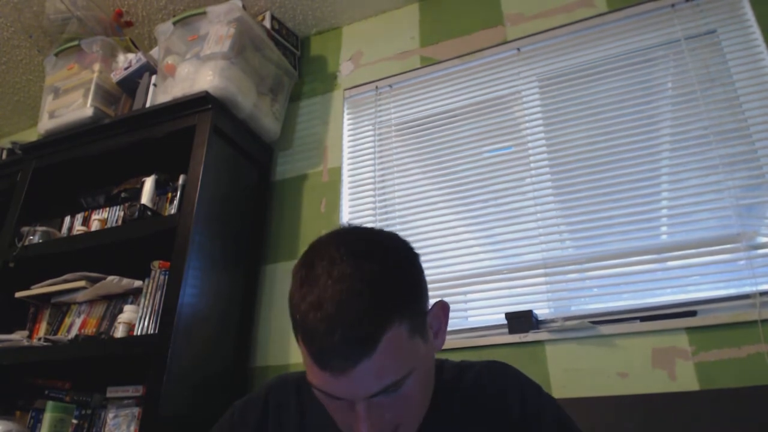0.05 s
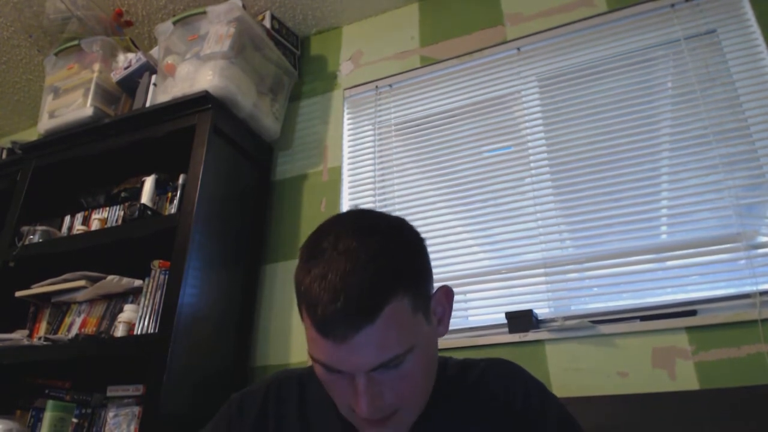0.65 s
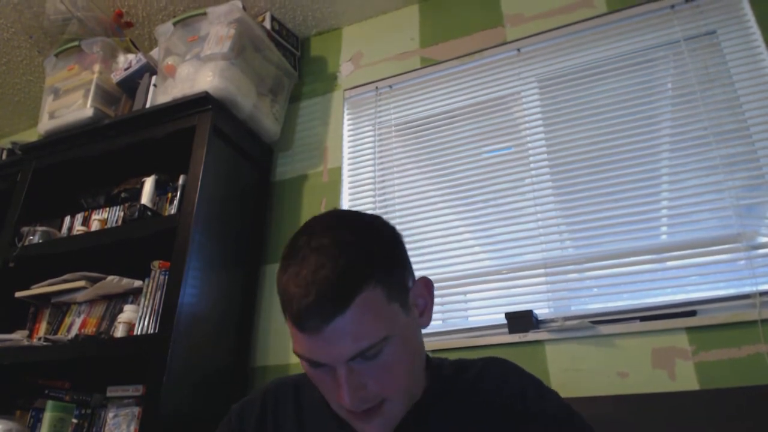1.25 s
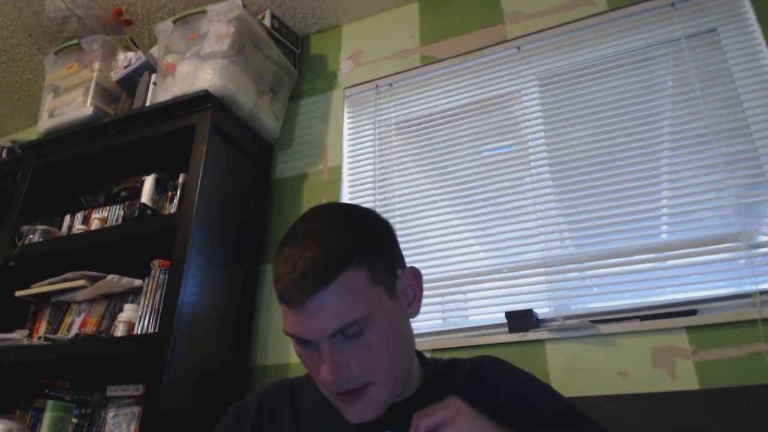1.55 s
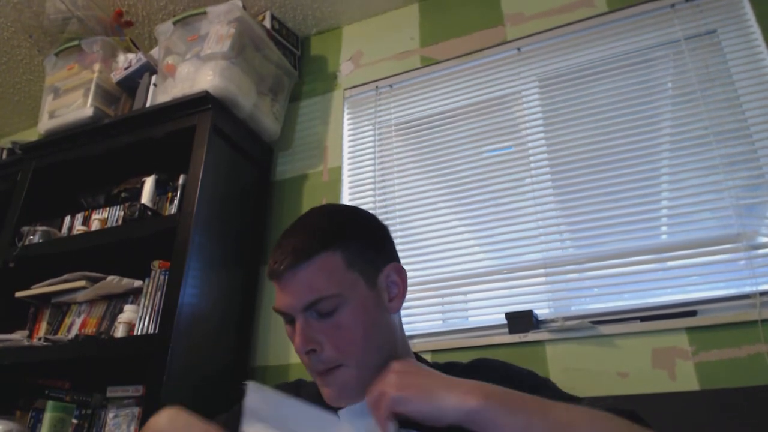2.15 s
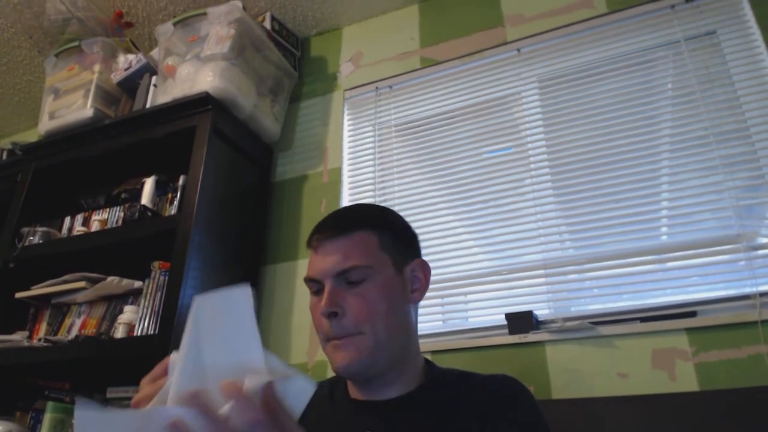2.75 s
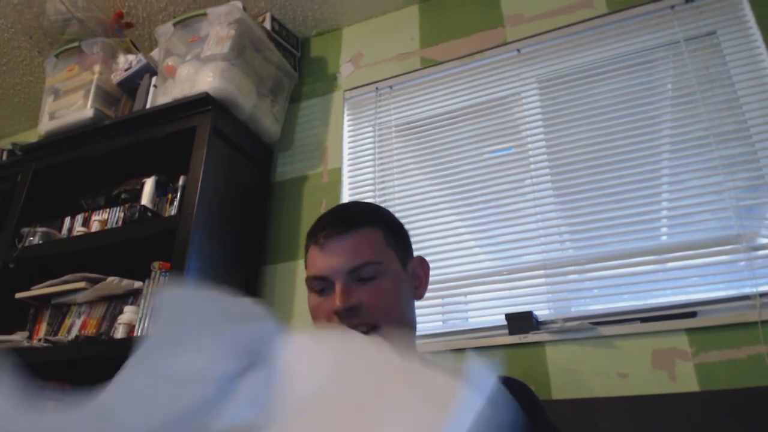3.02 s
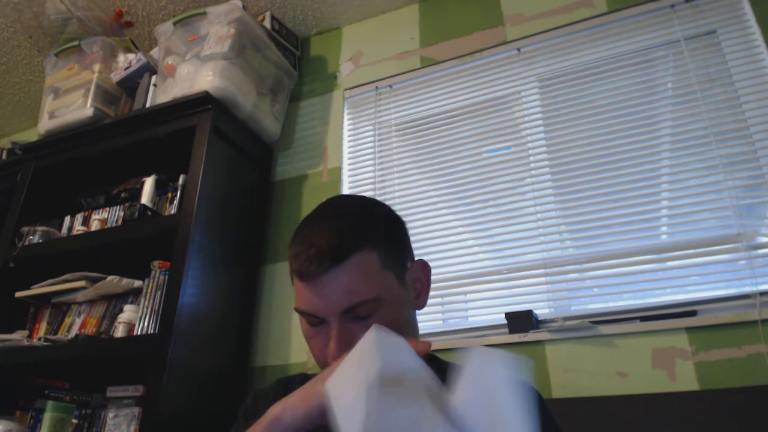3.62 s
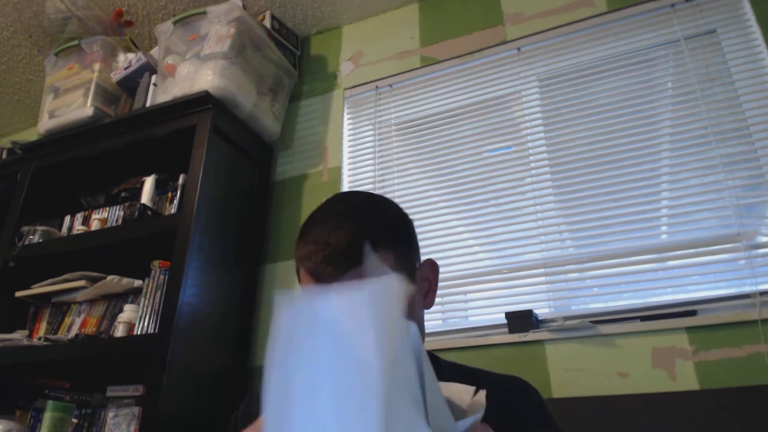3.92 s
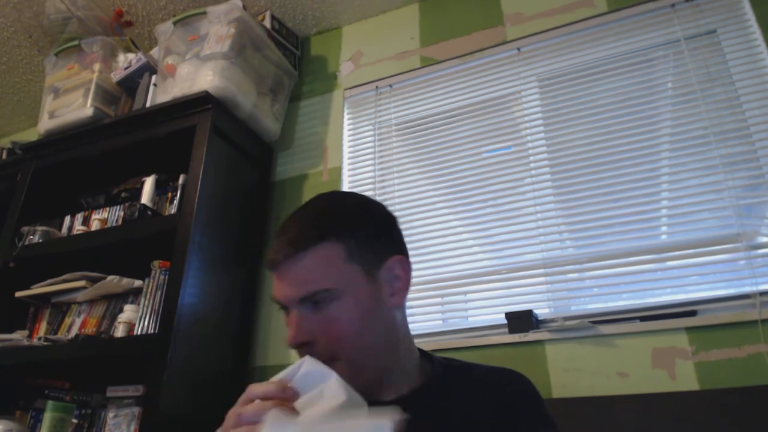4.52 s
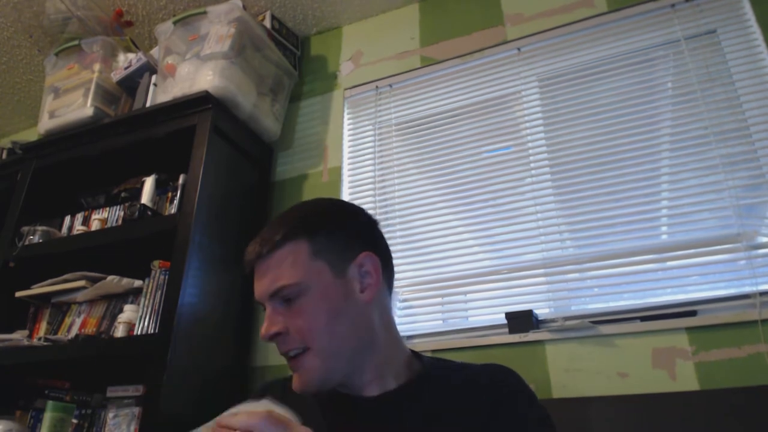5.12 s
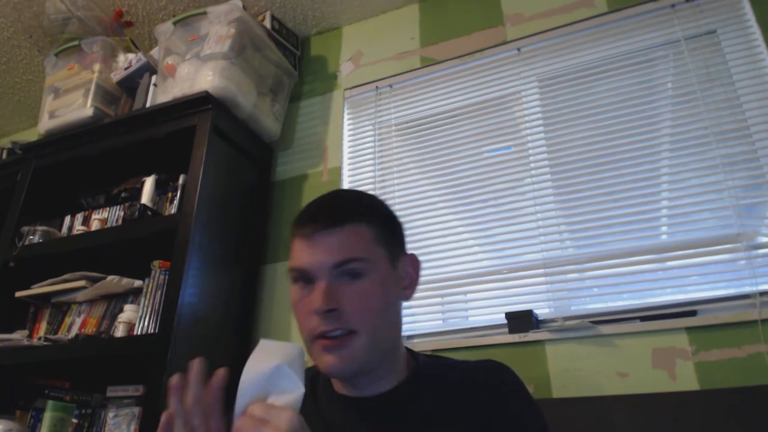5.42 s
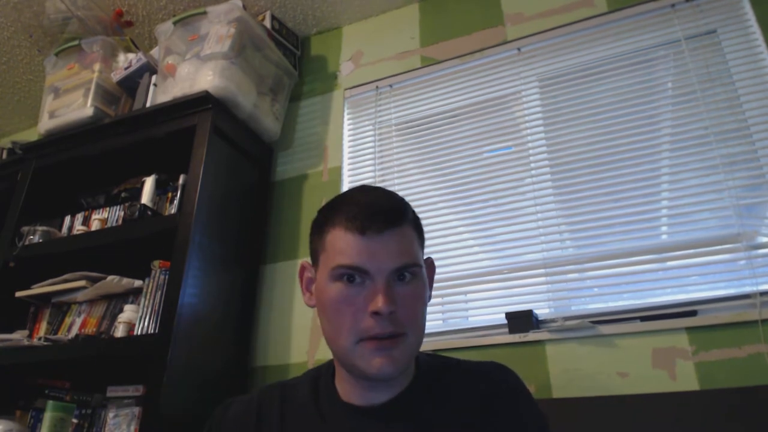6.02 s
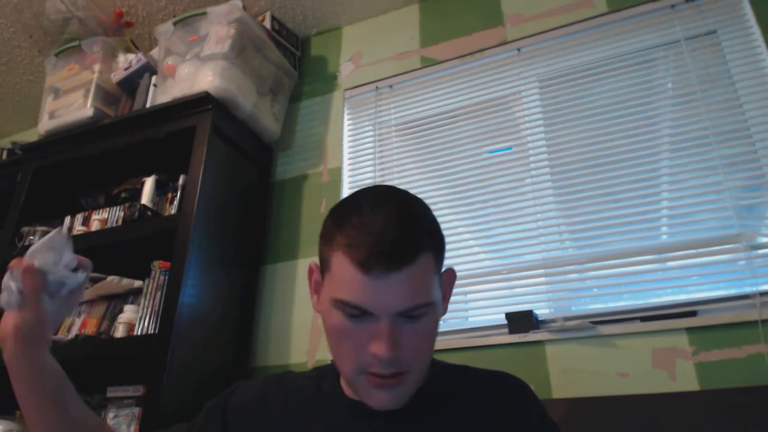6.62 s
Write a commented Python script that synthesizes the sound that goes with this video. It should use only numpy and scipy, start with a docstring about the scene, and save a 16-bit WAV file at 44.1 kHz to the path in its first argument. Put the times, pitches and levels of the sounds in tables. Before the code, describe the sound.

Stiff paper is pulled off a parcel, shaken open and crumpled close by, in loud, irregular crinkling bursts in a small, quiet room.

```python
"""Stiff wrapping paper, pulled off a parcel, shaken open and crumpled in a small, dry room,
close to a two-port desk microphone. The sheet buckles in avalanches of tiny clicks: each rings a
crease, flexes a panel and flaps the air; big folds snap singly. Paper sliding on paper hisses
underneath. Fingers tap its hollows, edges scrape, and now and then the sheet jerks taut with a
dry crack or thumps as a whole."""
import sys
import numpy as np
from scipy import signal
from scipy.fft import rfft, irfft, next_fast_len
from scipy.io import wavfile
from scipy.ndimage import uniform_filter1d, map_coordinates

SR = 44100
rng = np.random.default_rng(int(sys.argv[2]) if len(sys.argv) > 2 else 0)


def int16_out(signal):
    """Quantize to a 16-bit WAV file."""
    q = np.round(np.clip(np.atleast_2d(signal).T, -1, 1) * 32767)
    wavfile.write(sys.argv[1], SR, q.astype(np.int16))


N = 298326

# the first long pull is mostly sheet sliding on sheet, later it mostly buckles: t/s, extra sliding/dB
EXTRA_SLIDING = [(.3, 3.5), (1.05, 7), (1.4, 1.5), (5.2, 0), (5.4, 1)]


def amp(db):
    """Decibels to gain."""
    return 10 ** (np.asarray(db) / 20)


def unit(x):
    """Scale to rms 1."""
    return x / np.sqrt(np.mean(x ** 2) + 1e-20)


def along(points, hz):
    """Read (f/Hz, value) points on a log frequency axis."""
    f, values = np.transpose(points)
    return np.interp(np.log(hz + 1), np.log(f + 1), values)


def curves(rows):
    """One value per sample for each column after the time."""
    times, *columns = np.transpose(rows)
    return [np.interp(np.arange(N) / SR, times, column) for column in columns]


def wobble(rate):
    """A smooth random curve, rate knots a second."""
    return map_coordinates(rng.standard_normal(N // 10), [np.arange(N) * rate / SR], mode="mirror")


def coloured(x, db_of_hz):
    """x through the causal (minimum-phase) filter with this gain curve."""
    n = x.shape[-1]
    m = 2 * next_fast_len(n * 5 // 8)
    cepstrum = irfft(np.log(amp(db_of_hz(np.fft.rfftfreq(m, 1 / SR))) + 1e-6))
    cepstrum[1:m // 2] *= 2
    cepstrum[m // 2 + 1:] = 0
    return irfft(rfft(x, m) * np.exp(rfft(cepstrum)), m)[..., :n]


def bump(hz, centre, width):
    """A resonance peak of height 1."""
    return 1 / (1 + (2 * (hz - centre) / width) ** 2)


def levelled(x, size=1300):
    """Rms 1 over every few hundredths of a second; single clicks keep their shape."""
    power = uniform_filter1d(uniform_filter1d(x ** 2, size), size)
    return x / np.sqrt(np.abs(power) + 1e-12)


def patchy(x, gain_of_chance):
    """x under a random gain that changes smoothly from pitch to pitch and from moment to moment."""
    spectra = signal.stft(x, nperseg=256)[2]
    field = uniform_filter1d(rng.standard_normal(spectra.shape), size=3, axis=0)
    field = uniform_filter1d(field, size=12, axis=1)
    return signal.istft(spectra * unit(gain_of_chance(unit(field))), nperseg=256)[1][:N]


def handling(lead_s=0.011, attack_s=0.0083, sag_db_per_s=12.5):
    """Gains of flap, flex, crackle and fizz: each stroke takes hold, sags as the paper gives, and dies."""
    # pulls, shakes and squeezes: worked loose, pulled off from 2 s, crushed from 4.4 s, put by from 5.3 s
    # start/s, hold/s, release t60/s, crackle/dB, flex re crackle/dB, fizz re crackle/dB
    strokes = [ (0.004, 0.22, 0.24, -43.5, 3, -3), (0.224, 0.19, 0.3, -31, 6, 6.5),
               (0.443, 0.049, 0.15, -27.5, 0, 1), (0.513, 0.18, 0.14, -26.5, 1, 4.5),
               (0.696, 0.099, 0.7, -23.5, 0, -2), (0.97, 0.047, 0.46, -36.5, -4, 4),
               (1.145, 0.062, 0.075, -38.5, 4.5, -11), (1.258, 0.025, 0.025, -33.5, -5.5, -36),
               (1.361, 0.092, 0.074, -34.5, 4, 3), (1.396, 0.019, 0.27, -22.5, -6, 6),
               (1.64, 0.018, 0.057, -31, -1.5, 0.5), (1.651, 0.057, 0.65, -51, -17, 21.5),
               (1.77, 0.023, 0.29, -39.5, 4, 9.5), (1.999, 0.008, 0.042, -18.5, -7.5, -7.5),
               (2.021, 0.063, 0.081, -23, -4, -2.5), (2.133, 0.031, 0.38, -26, 0, -6),
               (2.219, 0.036, 0.2, -19, -1.5, -1.5), (2.279, 0.065, 0.069, -27, -3.5, -2.5),
               (2.369, 0.046, 0.29, -33.5, 3.5, -6), (2.417, 0.16, 0.1, -24, -2.5, -6),
               (2.633, 0.025, 0.35, -35.5, 7.5, -40), (2.985, 0.007, 0.065, -30, -4, -14),
               (3.07, 0.059, 0.15, -26.5, -6, -16), (3.139, 0.057, 0.065, -21, -6.5, 2),
               (3.268, 0.23, 0.46, -20.5, -5, -4.5), (3.509, 0.014, 0.062, -19.5, -19.5, 1.5),
               (3.592, 0.1, 0.39, -27, -12, -4), (3.685, 0.047, 0.71, -30, 0, -0.5),
               (3.815, 0.041, 0.13, -27.5, -2.5, 3), (3.902, 0.035, 0.17, -28.5, -5, 0.5),
               (4.036, 0.016, 0.032, -23, -13, -17.5), (4.144, 0.045, 0.081, -35, -11.5, 4),
               (4.419, 0.046, 0.26, -16.5, -6, -1), (4.497, 0.13, 0.97, -16.5, -6.5, -2),
               (4.803, 0.099, 0.56, -20, -6, -3), (4.97, 0.1, 0.27, -20.5, -4, -11.5),
               (5, 0.041, 0.43, -15, -5.5, -1.5), (5.125, 0.046, 0.24, -21.5, -3.5, -1.5),
               (5.207, 0.054, 0.096, -33.5, -4, 7), (5.333, 0.009, 0.098, -30.5, -21, -0.5),
               (5.394, 0.013, 0.33, -42.5, 2, 2.5), (5.539, 0.078, 0.108, -43.5, 8, -11),
               (5.658, 0.055, 0.24, -36.5, -10.5, -11.5), (6.058, 0.11, 0.051, -47, -22, 12.5),
               (6.215, 0.0063, 0.17, -36, -2, 12), (6.241, 0.0066, 0.057, -28.5, 6, 9.5),
               (6.298, 0.2, 0.36, -42.5, -15, -12)]
    # the paper stirs faintly as long as it is held: t/s, crackle/dB, fizz re crackle/dB
    holding = [(0, -54.5, 1), (1.1, -69, -3.5), (1.3, -51.5, -2), (1.6, -53.5, 3), (2.0, -51.5, 4.5),
               (2.72, -47, -5.5), (2.9, -55, -6), (4.12, -46, -9.5), (4.25, -62.5, -17), (4.4, -53, 3.5),
               (5.3, -55.5, 0), (5.95, -53.5, 1), (6.52, -55.5, 11), (6.76, -58.5, -6)]
    # an open sheet flaps the air, a tight ball hardly does: t/s, flap gain/dB
    openness = [(0, -20.5), (.33, -3.5), (.95, -15), (1.3, -5), (2.2, -4), (3.4, -4.5), (3.9, -3.5),
                (5.1, -10.5), (5.24, -47), (6.22, -40), (6.36, 7), (6.6, -28.5)]

    def shares(flex_db, fizz_db):
        """Power of the four layers relative to the crackle; the flap partly follows the flex."""
        return amp([[0.54 * flex_db], [flex_db], [0], [fizz_db]]) ** 2

    t = np.arange(N) / SR
    stir_db, stir_fizz_db = curves(holding)
    power = shares(flex_db=-6, fizz_db=0) * amp(stir_db) ** 2
    power[3] *= amp(stir_fizz_db) ** 2
    for start, hold, t60, db, flex_db, fizz_db in strokes:
        part = slice(*np.searchsorted(t, [start - 2 * lead_s, start + hold + t60]))
        age = t[part] - start
        fall_db = sag_db_per_s * (age - hold / 2) + 60 * np.maximum(age - hold, 0) / t60
        envelope = np.clip(age / attack_s, 0, 1) * amp(db - fall_db)
        power[:, part] += shares(flex_db, fizz_db) * envelope ** 2
        # as the hand first grips, the panels flex softly, with few creases
        grip = amp(db + flex_db - 9.5 - 20 * np.abs(age) / lead_s)
        power[1:3, part] += (amp([[0], [-25.5]]) * grip) ** 2
    flap, flex, crackle, fizz = np.sqrt(power)
    return flap * amp(curves(openness)[0]), flex, crackle, fizz


def buckles(per_second, spread_db, clump_db, clump_rate, count=14000):
    """Times (samples) and sizes (dB) of tiny buckles: many faint, few strong, bunched in avalanches."""
    at = (np.cumsum(rng.exponential(1, count)) * SR / per_second).astype(int)
    now = np.minimum(at, N - 1)
    uneven_db = spread_db - 0.45 * curves(EXTRA_SLIDING)[0][now]  # sliding evens out the sizes
    size_db = uneven_db * np.minimum(rng.standard_normal(count), 2.5)
    return at, size_db + clump_db * wobble(clump_rate)[now]


def facets(clicks, spectrum, ring_hz, octaves, cycles, scatter_db, slide_db, size):
    """Each buckle rings a facet of its own pitch for a few cycles, over the hiss of sliding paper."""
    at, size_db = clicks
    t = np.arange(size) / SR
    pitch_chance, level_chance = rng.standard_normal((len(at), 2)).T
    # neighbouring buckles share a fold, so their pitch drifts together
    drift_octaves = 0.33 * wobble(30)[np.minimum(at, N - 1)]
    hz = ring_hz * 2 ** (octaves * pitch_chance + drift_octaves)
    heard = at < N
    phase = hz[heard, None] * t
    strength = amp(size_db + scatter_db * level_chance)[heard, None]
    rings = strength * np.exp(-phase / cycles) * np.cos(2 * np.pi * phase)
    cloud = np.bincount((at[heard, None] + np.arange(size)).ravel(), rings.ravel(), N)[:N]
    cloud, hiss = coloured(np.array([cloud, rng.standard_normal(N)]), lambda f: along(spectrum, f))
    rubbing = amp(slide_db + curves(EXTRA_SLIDING)[0])
    return (unit(levelled(cloud)) + rubbing * unit(hiss)) / np.hypot(1, rubbing)


def folding(x, depth_db):
    """The changing shape of the sheet favours some pitches and hides others."""
    return patchy(x, lambda chance: amp(depth_db * chance))


def rustle():
    """The same buckles drive the whole sheet, its panels, its creases and its fibres."""
    # what each size of paper radiates: f/Hz, relative level/dB
    sheet_spectrum = [(20, -54), (50, -45), (110, 1), (170, 0.5), (330, 7.5), (450, 13), (800, -39.5)]
    panel_spectrum = [(150, -52.5), (330, -9), (450, -8.5), (950, -5), (1250, -23), (2400, -47.5)]
    crease_spectrum = [(450, -37), (900, -7), (1200, 3.5), (2800, -0.5), (3700, -10), (6500, -22)]
    fibre_spectrum = [(1500, -45.5), (2800, 3.5), (3600, -2), (6300, 2), (9000, 0)]
    flap_gain, flex_gain, crackle_gain, fizz_gain = handling()
    clicks = buckles(per_second=1150, spread_db=6.4, clump_db=3.7, clump_rate=110)
    flap = facets(clicks, sheet_spectrum, ring_hz=187, octaves=0.73, cycles=0.63,
                  scatter_db=1.5, slide_db=-7, size=600)
    flex = facets(clicks, panel_spectrum, ring_hz=683, octaves=0.36, cycles=2.06,
                  scatter_db=-0.5, slide_db=-12.5, size=500)
    crackle = facets(clicks, crease_spectrum, ring_hz=1850, octaves=0.62, cycles=2.3,
                     scatter_db=-1, slide_db=0, size=250)
    fizz = facets(clicks, fibre_spectrum, ring_hz=4950, octaves=0.4, cycles=2.6,
                  scatter_db=2.5, slide_db=1.5, size=120)
    sheet = flap_gain * flap + flex_gain * flex + crackle_gain * crackle
    # wide panels take strong colour from the folds, fine fibres little
    return folding(sheet, depth_db=2.1) + folding(fizz_gain * fizz, depth_db=1.3)


def finger_taps(rise_s=0.0015, cycles=1.8, click_t60=0.02, shiver_db=-19.5, shiver_t60=0.058, size=4096):
    """A soft fingertip rings a hollow for a few cycles, with a small click and a shiver at that pitch."""
    # taps on the paper: t/s, ring level/dB, ring f/Hz, click re ring/dB
    taps = [(0.0561, -10.5, 767, -5), (0.153, -14.5, 557, -8), (0.1822, -20.5, 582, -5),
            (1.156, -19, 890, -6.5), (1.16, -19.5, 945, -7), (1.264, -21.5, 1280, -11),
            (1.333, -15.5, 780, -18), (1.653, -18.5, 880, -7.5), (1.693, -17, 1300, -20),
            (2.655, -15.5, 500, -23.5), (4.1451, -23.5, 2450, -22.5), (5.665, -17.5, 550, -10),
            (5.7091, -23, 570, -3)]
    # the click of a fingertip: f/Hz, relative level/dB
    fingertip = [(60, -33.5), (500, -1.5), (2900, 9), (4000, -7)]
    out, t = np.zeros(N + size), np.arange(size) / SR
    for start, db, hz, click_db in taps:
        swing = (1 - np.exp(-(t / rise_s) ** 2)) * np.exp(-t * hz / cycles)
        ring = swing / swing.max() * np.sin(2 * np.pi * hz * t)
        click, shiver = rng.standard_normal((2, size))
        click = unit(coloured(click, lambda f: along(fingertip, f)))
        click *= amp(click_db - 60 * t / click_t60)
        shiver = unit(coloured(shiver, lambda f: 20 * np.log10(bump(f, hz, hz / 2))))
        shiver *= amp(shiver_db - 60 * t / shiver_t60)
        out[round(start * SR):][:size] += amp(db) * (ring + click + shiver)
    return out[:N]


def fold_snaps(crack_db=7, rise_s=0.0008, crack_t60=0.012, shiver_db=-3, shiver_t60=0.04, size=4096):
    """A fold pops: one sharp push, a crack that runs along it, then the sheet shivers and rings briefly."""
    # single folds snapping through: t/s, level/dB, ring f/Hz
    snaps = [(0.2218, -24.5, 838), (0.3777, -13, 864), (0.408, -21.5, 1078), (0.459, -21, 2880),
             (0.5068, -9.5, 2350), (0.711, -16.5, 1430), (0.749, -18.5, 1500), (0.7572, -28.5, 855),
             (0.7839, -15, 689), (0.989, -30, 3300), (1.192, -28, 3330), (1.3752, -11, 790),
             (1.3885, -13, 3090), (1.409, -10.5, 1310), (1.434, -15, 3060), (1.5115, -25, 3100),
             (1.6935, -17.5, 5100), (1.783, -16.5, 2270), (2.004, -25, 2430), (2.0317, -16, 1850),
             (2.0515, -10, 541), (2.052, -10.5, 1925), (2.135, -28, 1500), (2.159, -16.5, 1220),
             (2.2228, -16, 525), (2.2525, -17.5, 2880), (2.3005, -16, 2300), (2.313, -15.5, 1590),
             (2.4996, -10.5, 1880), (2.5542, -14, 1850), (2.82, -36, 1710), (2.931, -38, 1880),
             (3.0785, -22.5, 1850), (3.1026, -15, 2400), (3.15, -14.5, 2450), (3.1575, -13, 2090),
             (3.274, -13.5, 1177), (3.2935, -10.5, 2680), (3.3235, -22.5, 1236), (3.3667, -13.5, 557),
             (3.399, -7, 674), (3.4185, -10, 2550), (3.4647, -14.5, 1370), (3.4679, -9.5, 2100),
             (3.4785, -13, 1200), (3.5185, -20.5, 2000), (3.6382, -15, 2360), (3.6955, -10.5, 542),
             (3.7316, -17, 2780), (3.7483, -18.5, 518), (3.7865, -15.5, 1444), (3.8285, -14.5, 1530),
             (3.8341, -11.5, 1114), (3.858, -14.5, 1930), (3.9237, -13.5, 2560), (3.9392, -13.5, 1450),
             (4.0415, -22, 1760), (4.164, -24, 2660), (4.439, -13, 1880), (4.464, -11.5, 1646),
             (4.4975, -11, 1450), (4.5208, -8, 1517), (4.563, -17.5, 1183), (4.612, -19.5, 1200),
             (4.6445, -13.5, 2125), (4.658, -9, 1720), (4.72, -16.5, 2480), (4.8205, -15, 1530),
             (4.837, -18, 2580), (4.9582, -15.5, 794), (4.9914, -18, 1333), (5.1456, -17, 2100),
             (5.2504, -23.5, 2220), (5.3341, -31.5, 1610), (5.6771, -22.5, 1540), (5.7165, -29.5, 1450),
             (5.8737, -26.5, 2710), (6.0195, -38, 5060), (6.044, -20.5, 2340), (6.0502, -15, 1750),
             (6.0603, -19.5, 2300), (6.1062, -30.5, 4307), (6.1175, -25.5, 880), (6.14, -23, 2300),
             (6.1596, -31, 6060), (6.2205, -24.5, 4170), (6.2451, -28, 1470), (6.2571, -22, 1630),
             (6.3225, -22.5, 1390), (6.4163, -29, 3130), (6.4352, -34, 3200), (6.469, -25, 1230)]
    firm_db = -15.5  # a gentler pop rings more purely
    out, t = np.zeros(N + size), np.arange(size) / SR
    fades = amp([-60 * t / crack_t60, -60 * t / shiver_t60]) * (1 - np.exp(-t / rise_s))
    for start, db, hz in snaps:
        crack, shiver = rng.standard_normal((2, size)) * fades
        burst = crack / np.linalg.norm(crack) + amp(shiver_db) * shiver / np.linalg.norm(shiver)
        push = (t == 0) + amp(crack_db) * burst
        # a wide, low-ringing fold sounds hollow: its treble falls away sooner
        knee_hz = np.clip(1.6 * hz, 1100, 3200)
        tilt = [(30, -20.5), (130, -15.5), (330, -5.5), (600, -1), (knee_hz, 0), (4500, -5)]  # f/Hz, gain/dB
        # the harder the snap, the broader and less pitched its ring
        width_hz = 0.52 * hz * np.sqrt(amp(db - firm_db))
        ring_db = 11 + 0.45 * max(firm_db - db, 0)
        pop = coloured(push, lambda f: along(tilt, f) + ring_db * bump(f, hz, width_hz))
        pop *= np.sqrt(SR / 200 / np.sum(pop ** 2))  # the energy of 5 ms at rms 1
        out[round(start * SR):][:size] += amp(db + 0.5) * pop
    return out[:N]


def edge_scrapes(relative_width=0.2, roughness_db=4.5):
    """Stick and slip of a paper edge excites one broad resonance, which moves as the hollow changes shape."""
    # an edge drags over a hollow of the sheet: t/s, length/s, start f/Hz, end f/Hz, level/dB
    scrapes = [(0.24, 0.097, 2360, 2553, -22), (0.235, 0.13, 3070, 3160, -30),
               (0.321, 0.067, 451, 570, -25.5), (1.09, 0.13, 639, 823, -35.5),
               (1.148, .06, 1470, 1163, -31.5), (1.698, 0.026, 1250, 1580, -31),
               (1.699, 0.029, 485, 431, -37), (2.09, 0.17, 517, 484, -29), (2.575, 0.21, 1748, 1560, -33),
               (3.013, 0.027, 665, 740, -41.5), (3.218, 0.071, 748, 694, -35),
               (3.877, .08, 1454, 1335, -28), (3.93, .08, 1159, 893, -36), (3.956, .05, 450, 382, -34.5),
               (5.596, 0.036, 554, 1420, -39.5), (6.07, 0.081, 1062, 720, -40),
               (6.071, 0.11, 1550, 2530, -42), (6.287, 0.069, 1286, 1408, -34.5),
               (6.321, 0.087, 4220, 3460, -37.5), (6.436, 0.039, 1436, 1200, -38)]
    out, t = np.zeros(N), np.arange(N) / SR
    slips = amp(roughness_db * wobble(130))
    waver = 1 + 0.022 * wobble(49)
    for start, length, start_hz, end_hz, db in scrapes:
        part = (t >= start) & (t < start + length)
        progress = (t[part] - start) / length
        hz = (start_hz + (end_hz - start_hz) * progress) * waver[part]
        width_hz = relative_width * start_hz
        friction = rng.standard_normal(SR // 2)[:len(progress)]
        band = signal.lfilter(*signal.butter(2, width_hz, fs=SR), signal.hilbert(friction))
        tone = np.real(band * np.exp(2j * np.pi * np.cumsum(hz - width_hz / 2) / SR))  # centred on hz
        out[part] += amp(db) * unit(tone * slips[part]) * np.abs(np.sin(np.pi * progress)) ** 0.3
    return out


def taut_cracks(backwash_s=0.0023, size=2048):
    """The sheet jerks taut: one sharp push of air, a slow backwash, and no ring."""
    # jerks of the sheet: t/s, half width/s, push level/dB
    jerks = [(1.4106, .0004, -6), (2.053, .0004, -4), (3.3674, 0.00049, 1.5), (3.4003, .0004, -3),
             (3.696, 0.00058, -7.5), (5.0188, .0007, -3), (5.024, 0.00053, -5), (6.0536, 0.00015, 2.5),
             (6.2543, 0.0002, 0.5)]
    out, t = np.zeros(N + size), (np.arange(size) - size // 2) / SR
    for centre, half_width, db in jerks:
        push = np.exp(-(t / half_width) ** 2)
        backwash = np.exp(-(t / backwash_s) ** 2)
        backwash *= push.sum() / backwash.sum()  # as much air returns as was pushed
        out[round(centre * SR) - size // 2:][:size] += amp(db) * (push - backwash)
    return out[:N]


def sheet_thumps(size=4096):
    """A large panel pushes air for a few heavily damped swings."""
    # the whole sheet flaps or is squashed flat: t/s, f/Hz, level/dB, t60/s
    thumps = [(2.227, 305, -7.5, 0.045), (3.367, 162.5, -21, 0.033), (3.397, 152, -5.5, 0.025),
              (4.557, 160, -14, 0.077), (5.016, 292, -3.5, 0.041), (5.023, 205, -1.5, 0.021)]
    out, t = np.zeros(N + size), np.arange(size) / SR
    for start, hz, db, t60 in thumps:
        swing = (1 - np.exp(-t * hz * 2)) * np.sin(2 * np.pi * hz * t)
        out[round(start * SR):][:size] += amp(db - 60 * t / t60) * swing
    return out[:N]


def small_room(x, wet_db, build_s=0.006, positions=22):
    """The near walls add a short tail, which changes as the paper moves about."""
    # decay of the room: f/Hz, t60/s
    decay = [(120, 0.058), (500, 0.09), (2000, 0.091), (8000, 0.042)]
    hz, t, spectra = signal.stft(rng.standard_normal((positions, SR // 4)), SR, nperseg=256)
    tails = signal.istft(spectra * amp(-60 * t / along(decay, hz)[:, None]), SR, nperseg=256)[1]
    tails *= (1 - np.exp(-np.arange(tails.shape[1]) / SR / build_s)) / np.linalg.norm(tails[0])
    wet, hop = np.zeros(N + SR), N // positions + 1
    for k, tail in enumerate(tails):
        answer = signal.fftconvolve(x[k * hop:(k + 1) * hop], tail)
        wet[k * hop:][:len(answer)] += answer
    return (x + amp(wet_db) * wet[:N]) / np.hypot(1, amp(wet_db))


def room_tone(level_db):
    """The faint, steady noise of the room, mostly the same left and right."""
    # its spectrum: f/Hz, relative density/dB
    spectrum = [(18, -42), (30, -13), (189, -16), (643, -19.5), (1540, -1), (1860, -8), (4550, -19),
                (6630, -22.5), (8390, -55.5), (10900, -81.5), (18500, -120)]
    air = rng.standard_normal(N) + 0.5 * rng.standard_normal((2, N))
    return amp(level_db) * unit(coloured(air, lambda f: along(spectrum, f)))


def microphone_ports(x):
    """Two close ports of slightly unlike colour; as the sheet moves, each pitch reaches one a little early."""
    # how far the sound wanders between the ports: f/Hz, side re paper/dB
    wander = [(60, -14.5), (110, -33.5), (200, -19), (370, -12.5), (690, -18), (1270, -20.5), (2340, -30),
              (4310, -13), (7940, -28.5)]
    # colour of the ports: f/Hz, left minus right/dB
    balance = [(60, -.5), (180, 1.5), (310, -1.5), (530, -0.5), (910, 0.5), (1560, -0.5), (2680, -0.65),
               (4610, 0.44)]
    quarter_turn = np.imag(signal.hilbert(x, next_fast_len(N)))[:N]
    side = coloured(patchy(quarter_turn, lambda chance: chance), lambda f: along(wander, f))
    return np.array([coloured(x, lambda f: sign * along(balance, f) / 2) + sign * side
                     for sign in (1, -1)])


def scene():
    """Paper close to the microphone, a little of the walls, and room tone behind it."""
    paper = rustle() + finger_taps() + fold_snaps() + edge_scrapes() + taut_cracks() + sheet_thumps()
    return microphone_ports(small_room(paper, wet_db=-11.5)) + room_tone(level_db=-68.5)


def record(dry, ceiling=0.9, top_hz=8700):
    """A small speech-band desk microphone: coloured, rounding off the highest peaks, with no top octave."""
    # the microphone's bass and treble roll-off: f/Hz, gain/dB
    response = [(20, -30), (45, -9.5), (90, -6), (200, -2.5), (3000, 0.5), (4000, 2), (6200, -1.5),
                (7000, -6), (7700, -16.5), (8700, -35)]
    # resonances of the desk and microphone housing: f/Hz, width/Hz, lift/dB
    housing = [(550, 45, 3.5), (613, 110, -2)]
    x = coloured(dry, lambda f: along(response, f)
                 + sum(db * bump(f, hz, width) for hz, width, db in housing))
    x = x / (1 + np.abs(x / ceiling) ** 8) ** (1 / 8)
    return irfft(rfft(x) * (np.fft.rfftfreq(N, 1 / SR) < top_hz), N)


dry = scene()
out = record(dry)
int16_out(out)
```